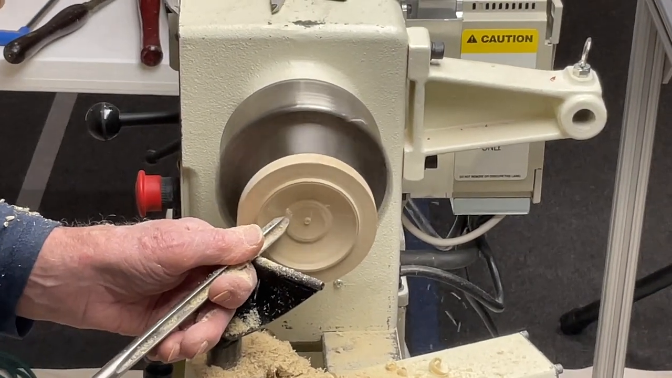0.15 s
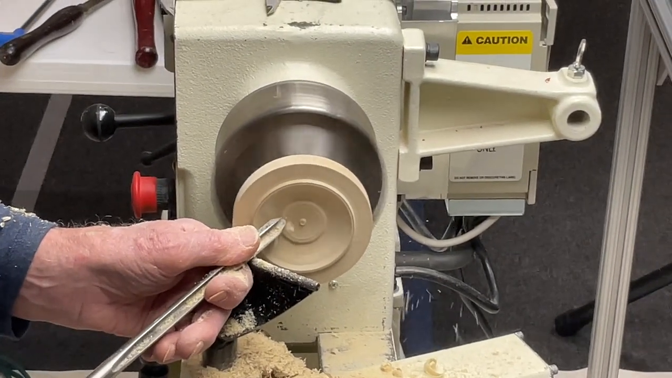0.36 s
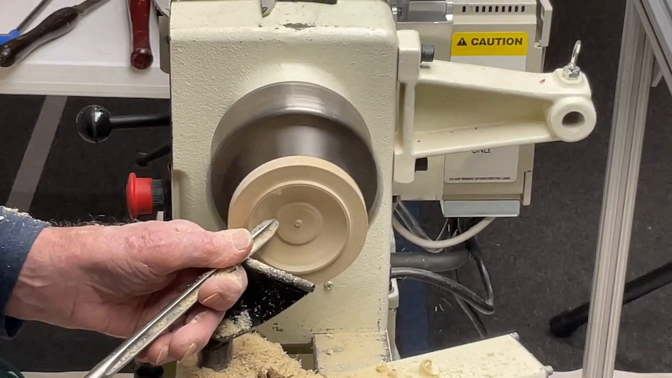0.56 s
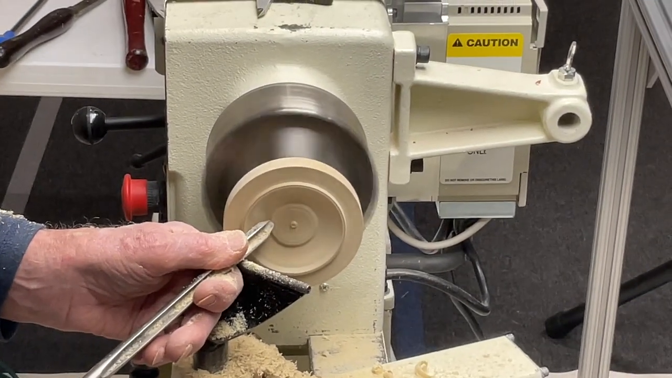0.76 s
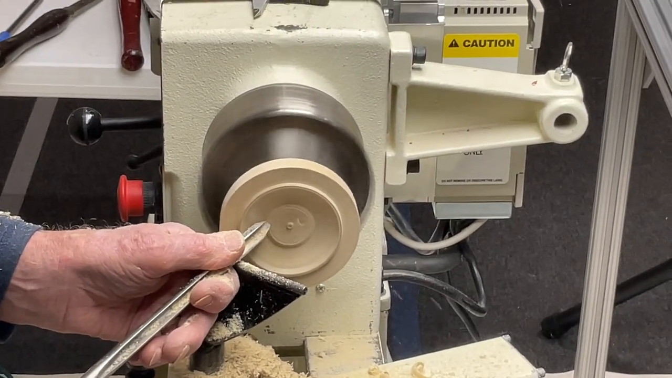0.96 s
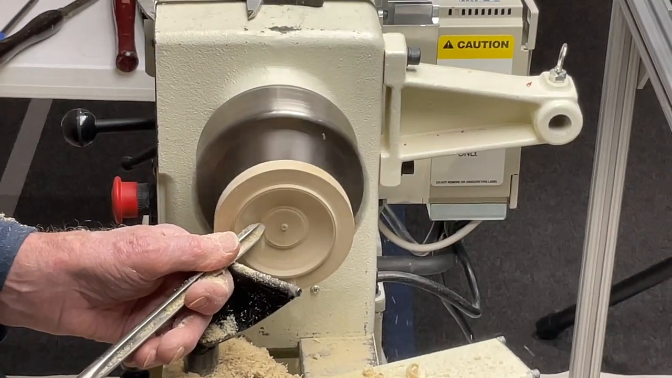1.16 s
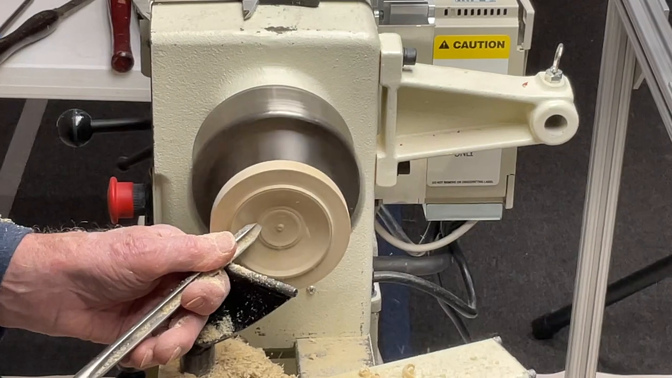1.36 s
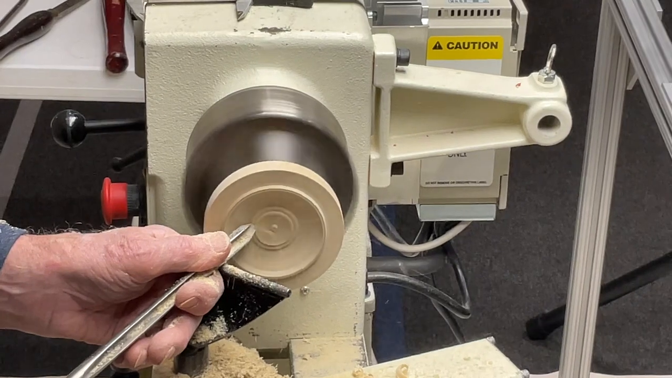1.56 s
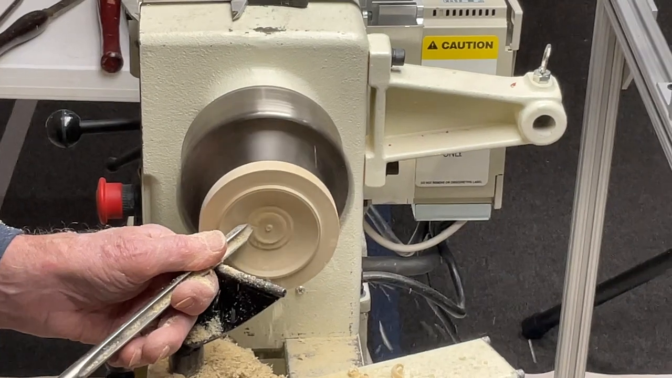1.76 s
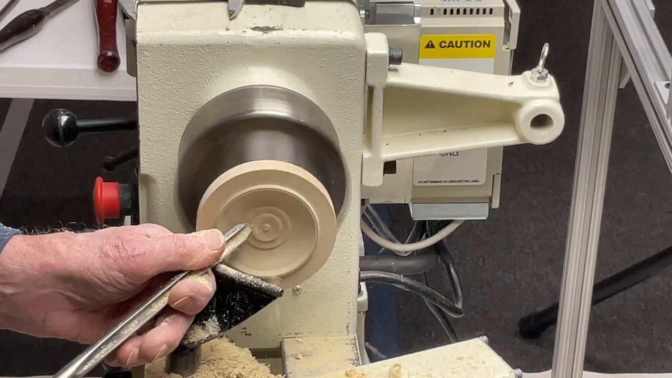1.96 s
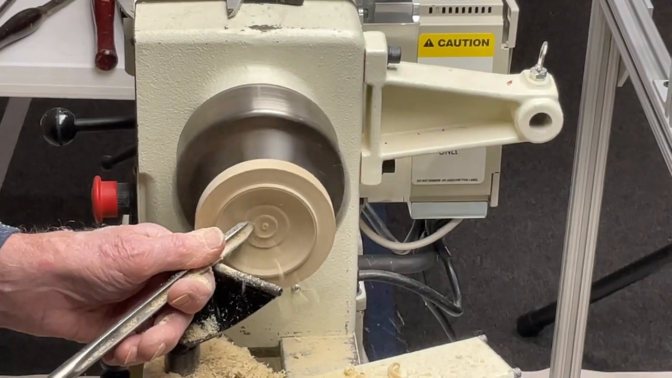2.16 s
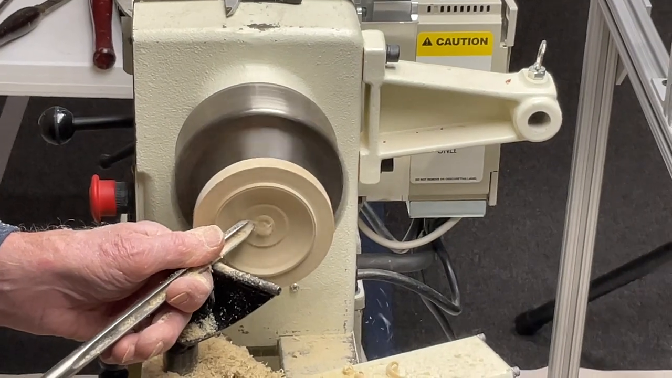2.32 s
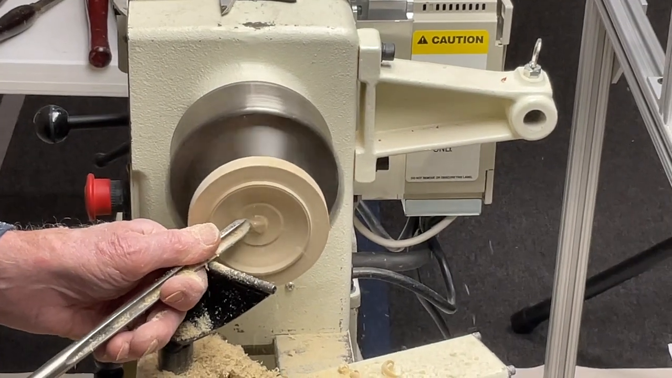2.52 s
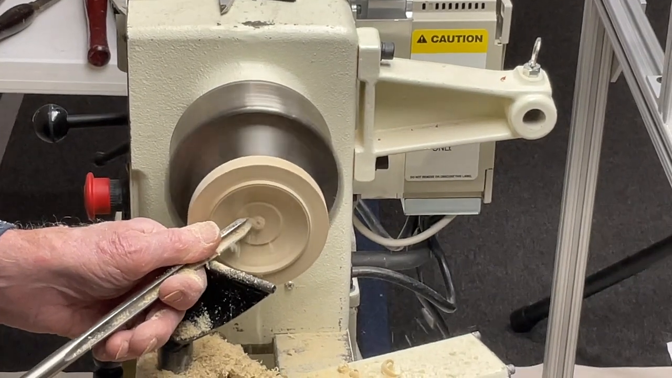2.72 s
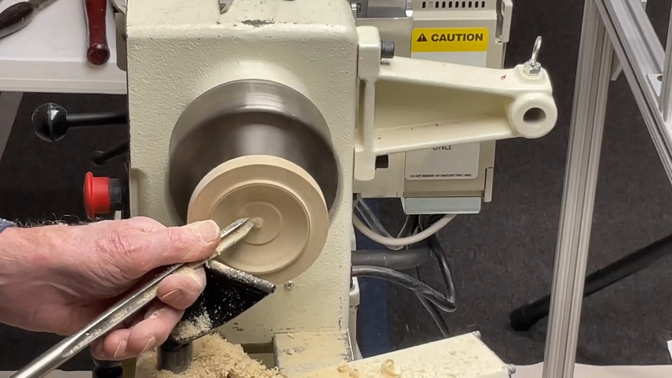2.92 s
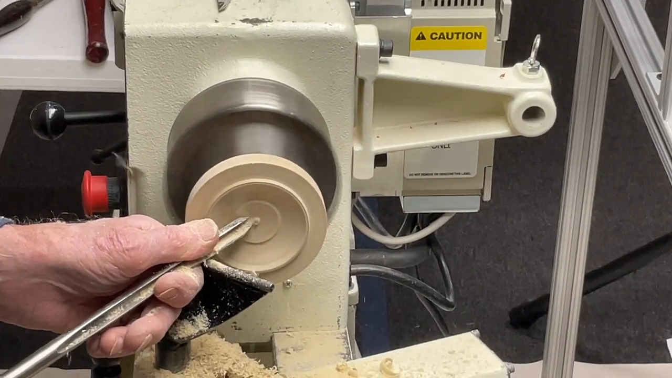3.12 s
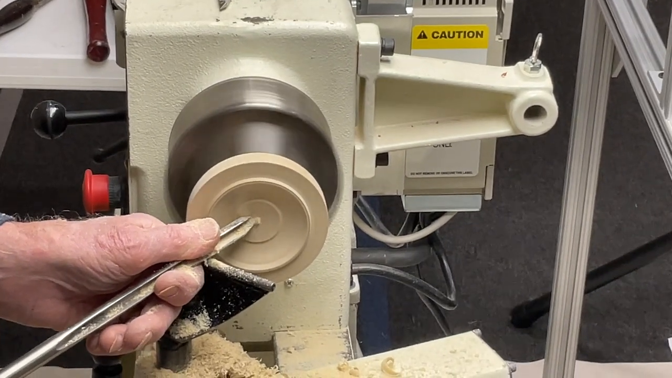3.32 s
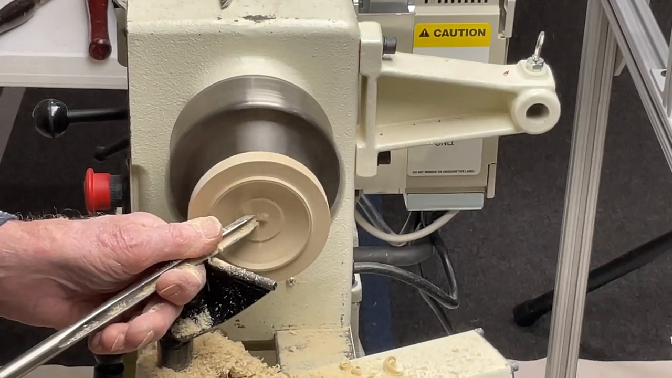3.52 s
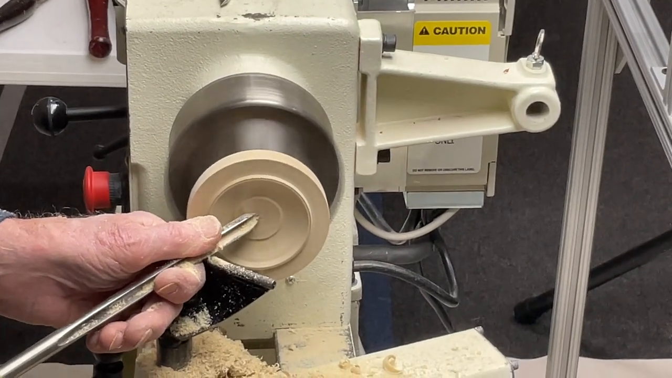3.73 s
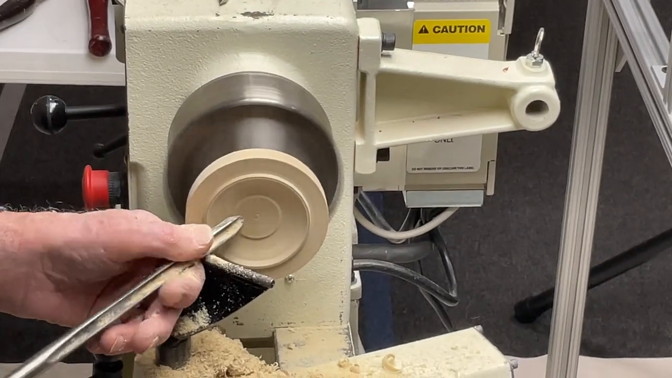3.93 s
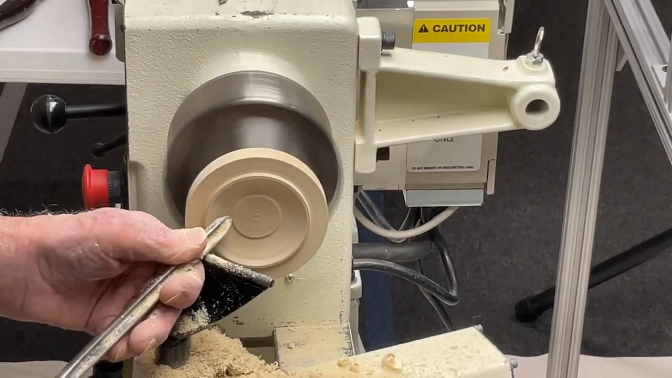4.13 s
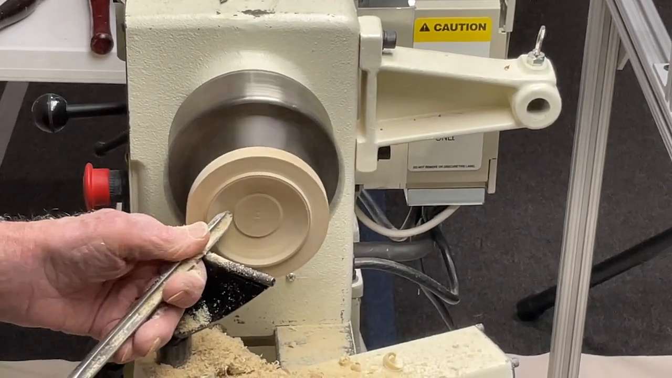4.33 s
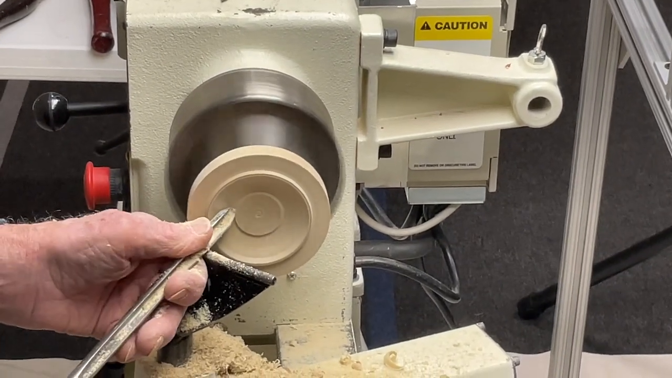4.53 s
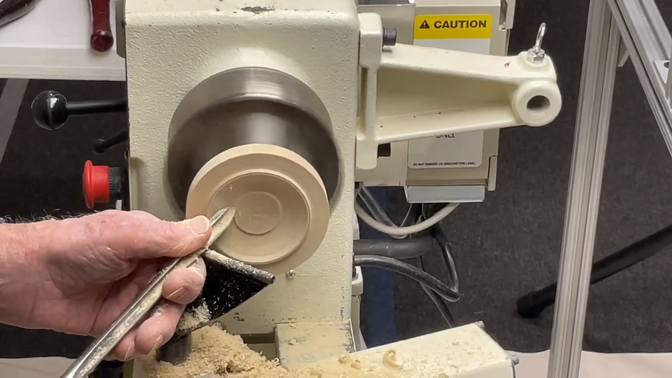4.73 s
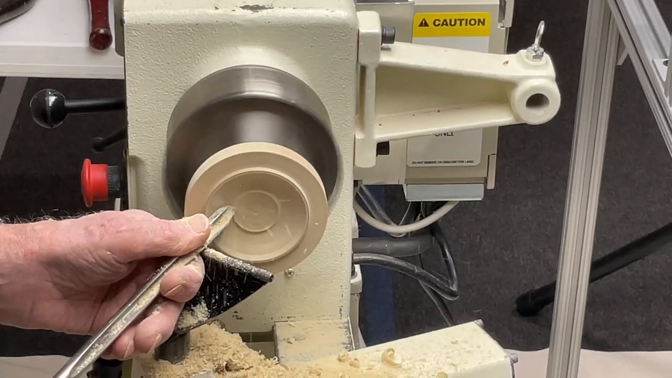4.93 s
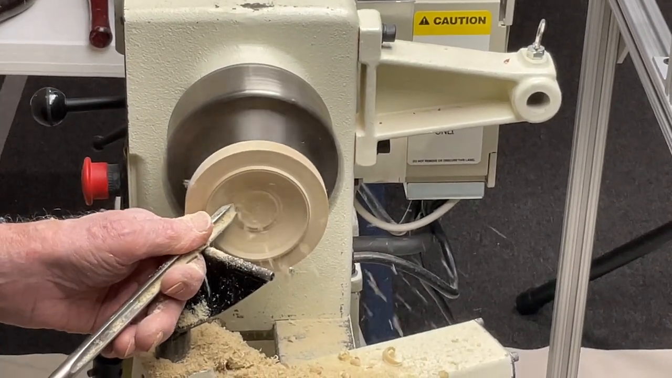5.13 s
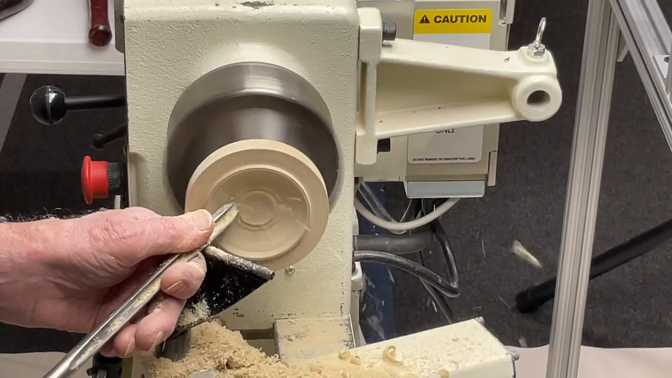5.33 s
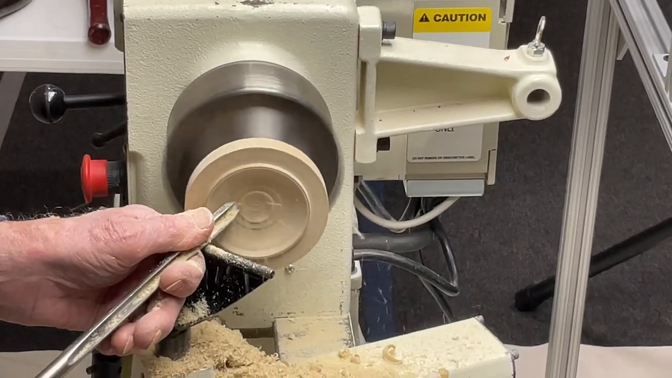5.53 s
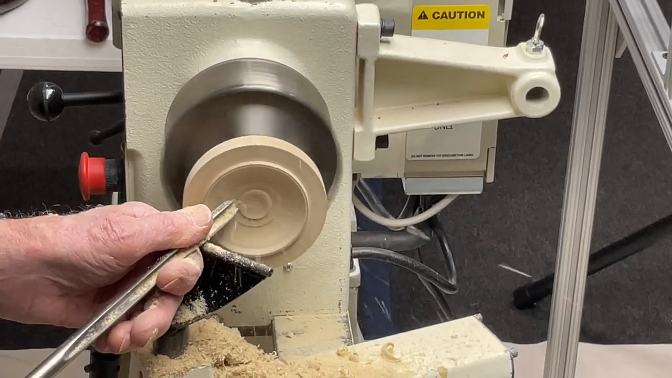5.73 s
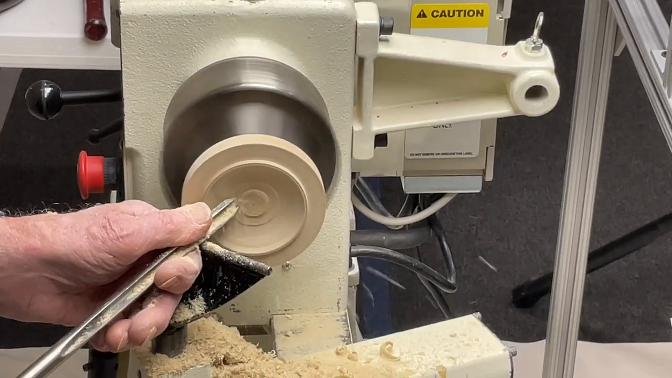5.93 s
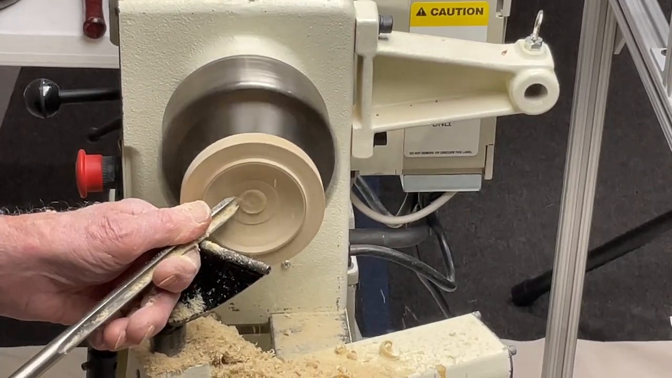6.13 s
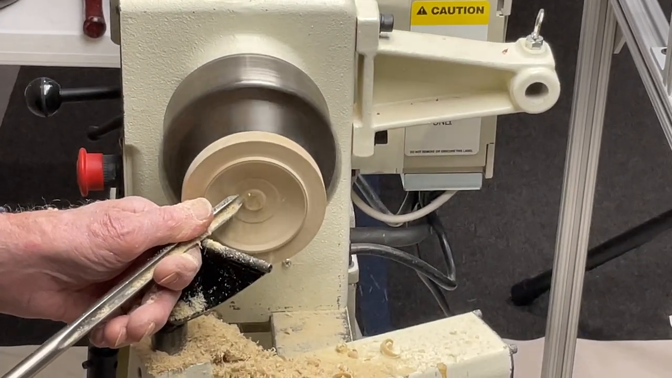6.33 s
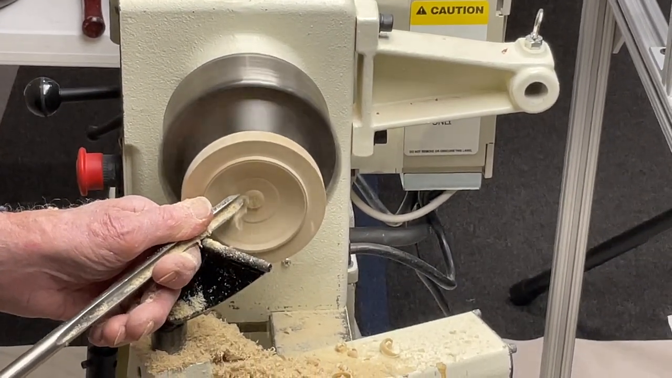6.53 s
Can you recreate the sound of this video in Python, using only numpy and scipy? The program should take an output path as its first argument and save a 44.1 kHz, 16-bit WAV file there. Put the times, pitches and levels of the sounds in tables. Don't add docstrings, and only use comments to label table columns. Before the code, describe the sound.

A wood lathe heard at arm's length on a phone's stereo microphones. Short hissing shave, brief pause, then a long grainy cut with metallic ringing and low groaning from the chuck, thinning towards the centre. Faint scratches and a few soft knocks on the rest leave only motor hum and room air, before a stronger, pulsing, rasping cut begins and continues until the sound stops.

```python
import sys
import numpy as np
from scipy import signal
from scipy.fft import rfft, irfft
from scipy.io import wavfile
from scipy.ndimage import uniform_filter1d

SR = 44100
rng = np.random.default_rng(int(sys.argv[2]) if len(sys.argv) > 2 else 0)


def master_out(mix):
    frames = np.transpose(np.atleast_2d(mix))
    ceiling = np.clip(frames, -1, 1)
    pcm = np.round(ceiling * 32767).astype(np.int16)
    wavfile.write(sys.argv[1], SR, pcm)


def invert_db(level):
    return 10 ** (np.asarray(level, dtype=float) / 20)


N = 289737
T, HZ = np.arange(N) / SR, np.arange(N // 2 + 1) * SR / N + 1e-9
TURNS_HZ = 25.27
LATER = int(9 * SR / TURNS_HZ)

# time in seconds, edge pressure in dB, depth of cut 0-1,
# weight of the shaft on the rest 0-1.
FIRST_PASS = [(-0.1, -30, 0.67, .2), (0.2, -33.5, 0.41, 0.23), (0.35, -34.5, 0.55, 0.54),
              (0.39, -37, 0, 0.62), (0.42, -59.5, .6, 0.54), (0.46, -70, .9, 0.1)]
SECOND_PASS = [(0.813, -31, 0.016, 0.29), (1.001, -30.5, 0.67, 0.36), (1.32, -29.5, 0.77, 0.62),
               (1.619, -29, 0.95, 0.87), (1.9, -28.5, 0.85, 0.9), (2.25, -28, 0.75, 0.89),
               (2.55, -31.5, 0.76, 0.86), (2.92, -40.5, 0.83, 0.74), (3.27, -57, 1, 0.7)]
SKIM = [(3.29, -46, 0.95, 0.64), (3.36, -52, 0.99, 0.39), (3.42, -56.5, 0.9, 0.75), (3.46, -67, .95, .7),
        (3.5, -53.5, 0.95, 0.7), (3.56, -70.5, .98, 0.74), (3.7, -72.5, 0.9, 0.57),
        (3.78, -100.5, 0.8, 0.48)]
THIRD_PASS = [(4.464, -33, .02, .05), (4.7, -26.5, 0.55, .34), (4.95, -25, 0.93, 0.47),
              (5.13, -25.5, 0.86, 0.92), (5.4, -26, 0.85, 0.57), (5.75, -26.5, .97, 0.51),
              (5.98, -26.5, 0.78, 0.87), (6.3, -27.5, 0.63, 0.71), (6.57, -30.5, 0.67, 0.93)]
# time the edge would reach the centre in seconds, end-grain throb in dB,
# chatter in dB, share 0-1 that rides old ripples at first, delay of the blank's throb in turns.
WOOD = [
    (1.6, 5, -26, 0.7, .3),
    (3.3, 1.1, -7, .45, 0.24),
    (4.1, -0.5, -7, 0.3, 0.56),
    (7.3, 1.5, -5, .95, 0.37),
]
# start in seconds, peak in dB.
TOUCHES = [(0.243, -19), (0.8376, -9), (0.878, -14.5), (2.776, -26.5), (2.8165, -26), (2.856, -22),
           (3.3106, -25.5), (3.332, -35), (3.351, -28.5), (3.485, -28), (3.5319, -56.5), (5.1485, -24)]
# centre in seconds, length in seconds, change of edge in dB,
# change of chuck and rest in dB.
SKIPS = [(1.623, 0.015, -0.8, -6), (2.254, 0.026, -0.5, 0.5), (2.7, 0.034, 0.5, -11),
         (5.131, 0.0082, -7, 0), (5.286, 0.037, -1.4, -0.5), (5.955, .03, -.3, -1.5),
         (6.26, 0.036, -1.5, 3.5)]
# centre in seconds, length in seconds,
# level over the steady groan in dB, pitch in Hz.
DIGS = [(1.277, 0.11, 0.5, 724), (1.6, .13, 4.5, 1518), (1.778, 0.077, -2.5, 724), (1.966, .12, 0.5, 610),
        (2.13, 0.071, -0.5, 624), (2.324, 0.029, -2, 680), (2.47, 0.028, 3, 690), (2.779, 0.0083, 3.5, 726),
        (4.935, 0.14, -1, 1480), (5.018, 0.071, -9, 713), (5.17, 0.03, -9, 685), (5.438, 0.088, -1, 546),
        (5.508, 0.031, 3, 730), (5.624, .07, -1, 750), (5.859, 0.069, 5, 510), (6.024, 0.057, 7, 653),
        (6.172, 0.058, 8.5, 575), (6.379, 0.1, 11, 550)]
# start in seconds, peak in dB, pitch in Hz, 60 dB decay in seconds.
KNOCKS = [
    (0.4, -48, 138, 0.067),
    (0.95, -38, 188, 0.052),
    (3.424, -29, 158, 0.064),
    (3.509, -28, 187, 0.061),
    (3.926, -26, 470, 0.026),
]

# centre in Hz, width in Hz, level in dB.
STEEL = [(3517, 142, 1), (3970, 124, -9.5), (5779, 297, -7), (6855, 262, -7), (9950, 130, -10),
         (12520, 370, -18), (13930, 320, -22.5)]
BLANK = [(1520, 150, -11), (2030, 250, -8), (2260, 130, 0), (2420, 200, -5), (2570, 170, 0),
         (2820, 200, -2), (3080, 300, -7)]
CHATTER = [(1690, 70, -7), (1800, 70, 0), (1865, 70, -.7)]
SHAVINGS = [(3183, 450, 9), (4570, 200, -1), (5080, 380, -15.5), (6140, 380, -7.5), (7810, 620, -8.5),
            (8150, 340, -12.5), (9800, 520, -13), (9850, 600, -7.5), (11500, 1000, -14.5),
            (12530, 3000, -25), (15250, 1000, -16.5)]
CHUCK = [(461, 26, 1), (547, 204, -3), (663, 43, 2.5), (741, 35, 1), (920, 138, 1.5), (1225, 160, -0.5)]
HEADSTOCK = [(1054, 12, 0), (1083, 10, -4)]
REST = [(102, 3, -3.5), (165, 35, 1.5), (218.3, 13, 1.5), (282, 23, -1), (333, 95, -9)]

# pitch in Hz, level in dB rms.
MOTOR = [(484.5, -81), (796.7, -81), (1023, -75), (1055, -62), (1082, -65), (1114, -74), (1206, -73),
         (1276, -78), (1324, -75), (1416, -78), (1443, -69), (1475, -79), (1642, -74), (1814, -83)]
DRIVE = [(8608, -95), (8969, -102), (9690, -99), (9808, -98), (9932, -86), (10051, -90), (10174, -89),
         (10293, -97), (11133, -87), (11256, -88), (11375, -95), (11617, -102)]
# frequency in Hz, density in dB per Hz.
AIR = [(55, -19.5), (110, -2), (900, -2.5), (1060, 1.5), (1300, -3), (1800, -3), (2000, -13.5), (2260, -9),
       (2500, -5), (3500, -14.5), (5500, -21.5), (8100, -36), (10200, -14), (11200, -24.5), (12500, -63.5)]

# time in seconds, gain in dB.
STEADY_GAIN = [(0, 3.5), (3.3, 3.5), (3.7, 2), (4., 0), (4.45, -1), (4.8, 3.5), (6.57, 3.5)]
# frequency in Hz, lead of the left in radians.
PORT_PHASE = [(520, -.1), (860, .8), (1200, .6), (1720, -.66), (2150, -2.4), (2550, -2.97), (2930, -3.2),
              (3100, -3.55), (3790, -5.6), (4300, -6.15), (5000, -5.95), (5340, -5.45), (6250, -6.1),
              (7200, -5.1), (8270, -6.28)]
# frequency in Hz, left minus right in dB.
PORT_BALANCE = [(100, 0), (550, 0), (860, 4.5), (1720, 4.5), (2000, 2), (2450, 2), (2600, 0), (16000, 0)]
# frequency in Hz, level of unrelated sound in dB.
DIFFUSE = [(30, -6), (80, -16), (400, -9), (800, -6), (2050, -6), (2300, -13), (2800, -21), (3500, -12),
           (5250, -7), (5800, -12), (7400, -6), (8100, -10), (8400, -40), (12000, -20), (14500, -9)]
# frequency in Hz, level in dB per bin.
QUIETEST = [(2000, -140), (10300, -125), (10500, -104), (12000, -100), (13500, -107), (15000, -89),
            (15700, -72.5)]


def curve(table):
    s, *columns = np.transpose(table)
    return [np.interp(T, s, c) for c in columns]


def over_hz(table):
    hz, value = np.transpose(table)
    return np.interp(np.log(HZ), np.log(hz), value)


def walk(rate):
    hold = int(SR / rate)
    steps = np.repeat(rng.standard_normal(N // hold + 1), hold)
    return 1.8 * uniform_filter1d(uniform_filter1d(steps, hold), hold)[:N]


def swell(s, length):
    return np.exp(-((T - s) / length) ** 2)


def ring(force, modes, size=32768):
    f = np.arange(size // 2 + 1) * SR / size + 1e-3
    gain = sum(invert_db(db) / (1 + ((f - hz) / (.8 * width)) ** 2) for hz, width, db in modes)
    gain = gain * f ** 2 / (f ** 2 + 75 ** 2)
    cepstrum = irfft(np.log(gain / np.sqrt(np.mean(gain ** 2))))
    cepstrum[1:] *= 2 * (np.arange(1, size) <= size // 2)
    response = irfft(np.exp(rfft(cepstrum)))[:size // 2]
    return signal.fftconvolve(force, response)[:N]


def fibres(depth_db, delay, bite_db, flicker_db, repeat):
    angle = 2 * np.pi * (TURNS_HZ * T - delay)
    throb_db = depth_db * (np.cos(2 * angle) + .25 * np.cos(angle) + .4 * np.cos(4 * angle))
    fresh, ripples = rng.standard_normal((2, N)) * invert_db(1.5 * rng.exponential(size=(2, N)))
    last_turn = np.exp(-2j * np.pi * HZ / TURNS_HZ)
    ripples = irfft(rfft(ripples) * .53 / (1 - .85 * last_turn), N)
    repeat = np.clip(repeat, 0, 1)
    force = np.sqrt(1 - repeat) * fresh + np.sqrt(repeat) * ripples
    force = force * invert_db(throb_db + bite_db + flicker_db * walk(150))
    return force / np.sqrt(uniform_filter1d(force ** 2, SR // 8))


def gouge():
    steel_db, depth, weight, radius, throb_db, chatter_db, repeat, blank_delay = passes()
    lose_db, slack_db = sum(np.outer(db, swell(s, length)) for s, length, *db in SKIPS)
    steel_db = steel_db + lose_db
    speed_db = 20 * np.log10(radius)
    chatter_db = chatter_db - 5.5 / (1 + (radius / 0.19) ** 8) + 2.6 * repeat
    steel_depth = throb_db + 6 * (1 - radius) ** 2 + 1.5 * repeat ** 2
    blank_depth = 1.64 + 8 * repeat
    blank_db = steel_db - 2 + 5 * depth + 0.2 * (np.minimum(chatter_db, -4) + 5.5)
    rest_push = invert_db(-92.5 + 59 * weight + slack_db)
    chuck_push = invert_db(steel_db - 48.5 + 44 * depth + slack_db) + rest_push * invert_db(-15.5)
    bite_db = .8 * walk(30)

    out = steel_and_shavings(steel_db, steel_depth, bite_db, repeat, speed_db)
    wood = fibres(blank_depth, blank_delay, bite_db, 1.3, repeat)
    out += ring(np.roll(wood, LATER) * invert_db(blank_db), BLANK)
    out += ring(wood * invert_db(blank_db + chatter_db + 0.29 * speed_db), CHATTER)
    out += chuck(fibres(.6 * blank_depth, blank_delay, bite_db, 1.5, .58), chuck_push)
    rub = fibres(.4 * steel_depth, .21, bite_db, 2.5, 0.58)
    out += ring(rub * rest_push * invert_db(-1.0), REST)
    return irfft(rfft(out) * (1 - .96 / (1 + ((HZ - 10090) / 380) ** 4)), N)


def passes():
    spans = [FIRST_PASS, SECOND_PASS, SKIM, THIRD_PASS]
    starts = np.array([span[0][0] for span in spans])
    rows = [(s - 1e-4, -100, 0, 0) for s in starts]
    for span in spans:
        lifted = span[-1][0] + .018
        rows += [*span, (lifted, -100, span[-1][2], 0), (lifted + 1e-4, -100, 0, 0)]
    edge_db, depth, weight = curve(sorted(rows))
    now = np.maximum(np.searchsorted(starts, T) - 1, 0)
    age = T - starts[now]
    centre_s, throb_db, chatter_db, ripples, delay = np.array(WOOD)[now].T
    radius = np.clip(1 - age / (centre_s - starts[now]), 0.076, 1)
    attack_s, ripples_wear_s = 0.024, 0.44
    entry_db = 40 * np.log10(1 - np.exp(-np.maximum(age, 1e-5) / attack_s))
    repeat = ripples * np.exp(-(age / ripples_wear_s) ** 2)
    return edge_db + entry_db, depth, weight, radius, throb_db, chatter_db, repeat, delay


def grazes():
    force = np.zeros(N)
    for s, db in TOUCHES:
        age = np.maximum(T - s, 0) / 0.0033
        force += invert_db(db - 13.0) * age * np.exp(1 - age)
    return force


def steel_and_shavings(steel_db, throb_db, bite_db, repeat, speed_db):
    delay = .21 + 0.25 * repeat ** 2
    edge = fibres(throb_db, delay, bite_db, 1.33, .2 + .5 * repeat)
    early = np.roll(edge, -int(.11 * SR / TURNS_HZ))
    graze = grazes()
    push = invert_db(steel_db) + graze
    out = ring(edge * push * invert_db(-1.94), STEEL[:2])
    out += ring(early * push * invert_db(-4.5), STEEL[2:])
    thrown = (push - .85 * graze) * invert_db(5.5 + 0.75 * speed_db - 5.0)
    return out + ring(np.roll(early, LATER) * thrown, SHAVINGS)


def chuck(tearing, push):
    groan = tearing * push
    out = ring(groan * invert_db(-1.67), CHUCK)
    heard = np.zeros(N)
    for s, length, db, hz in DIGS:
        dig = invert_db(db) * swell(s, length)
        out += ring(groan * dig, [(hz, 181, 0)], size=4096)
        heard += dig * np.exp(-((hz - 696) / 94) ** 2)
    shake = rng.standard_normal(N) * push * invert_db(-2.0) * (1 + 0.9 * heard)
    return out + ring(shake, HEADSTOCK)


def knocks():
    out = np.zeros(N)
    for s, db, hz, t60 in KNOCKS:
        age = np.maximum(T - s - .002, 0)
        rise = 1 - np.exp(-(age * hz / 0.54) ** 2)
        tap = invert_db(-60 * age / max(t60, .01)) * np.sin(2 * np.pi * 1.096 * hz * age)
        thud = 0.65 * np.sin(2 * np.pi * max(0.413 * hz, 120) * age)
        thud = thud * invert_db(-60 * age / 0.043) * np.minimum(age / 0.0069, 1)
        out += invert_db(db - 0.5) * rise * (tap + thud)
    return out


def rattle():
    s, db = KNOCKS[-1][:2]
    age = T - s - .002
    decay = invert_db(db - 24.5 - 60 * np.maximum(age, 0) / .09)
    return ring(rng.standard_normal(N) * (age > 0) * decay, BLANK)


def whine(lines):
    out = np.zeros(N)
    for (hz, db), start in zip(lines, rng.random(len(lines))):
        out += np.sqrt(2) * invert_db(db + .8 * walk(4)) * np.sin(2 * np.pi * (hz * T + start))
    return out


def air():
    gusts = rng.standard_normal(N) * invert_db(1.5 * walk(20))
    noise = irfft(rfft(gusts) * invert_db(over_hz(AIR)), N)
    return noise / np.sqrt(np.mean(noise ** 2)) * invert_db(-64.5)


def ports(x, tilt, scatter):
    hz, turn = np.transpose(PORT_PHASE)
    half = invert_db(tilt * over_hz(PORT_BALANCE) / 2) * np.exp(.5j * np.interp(HZ, hz, turn))
    tail = rng.standard_normal((2, N)) * invert_db(-60 * T / .15)
    tail /= np.sqrt(np.sum(tail ** 2, axis=1, keepdims=True))
    scattered = scatter * invert_db(over_hz(DIFFUSE)) * rfft(tail)
    return irfft(rfft(x) * (np.array([half, 1 / half]) + scattered), N)


def drop_faint(x):
    mid_side = np.array([x[0] + x[1], x[0] - x[1]]) / 2
    hz, _, bins = signal.stft(mid_side, SR, "hann", 2048)
    power = uniform_filter1d(np.abs(bins) ** 2, size=12, axis=1)
    around = uniform_filter1d(power.max(axis=0), size=100, axis=0) * invert_db(2 * -22)
    quiet = invert_db(2 * np.interp(hz, *np.transpose(QUIETEST)))[:, None]
    mask = around * invert_db([0, 14])[:, None, None]
    floor = quiet * invert_db([0, -16])[:, None, None]
    kept = (power > np.maximum(mask, floor)) | (hz < 2300)[:, None]
    mid, side = signal.istft(bins * kept, SR, "hann", 2048)[1][:, :N]
    return np.array([mid + side, mid - side])


def scene():
    gain = invert_db(curve(STEADY_GAIN)[0])
    close = ports(gouge() + knocks(), 1, 1) + ports(rattle(), 1, 1)
    tones = whine(MOTOR) * gain * invert_db(3.0) + whine(DRIVE)
    return close + ports(tones, 0, .15) + ports(air() * gain, 0, 1.5)


def low_pass(x):
    return signal.sosfilt(signal.butter(12, 16040, fs=SR, output="sos"), x)


def record(dry):
    top = signal.ellip(8, .2, 70, 15760, fs=SR, output="sos")
    mix = drop_faint(signal.sosfilt(top, dry))
    return low_pass(mix)


dry = scene()
out = record(dry)
master_out(out)
```